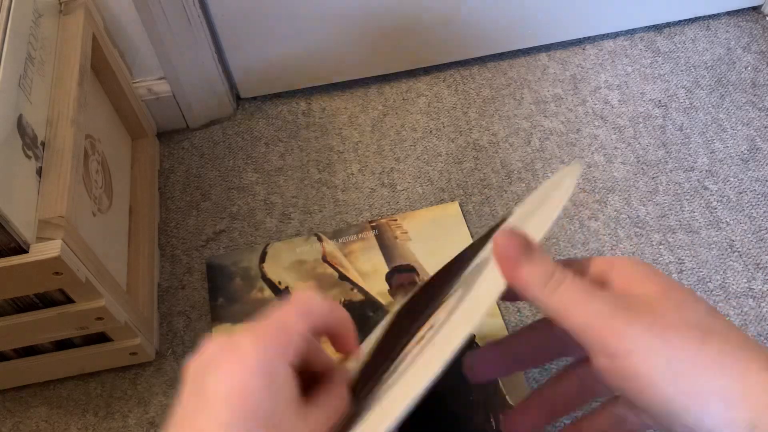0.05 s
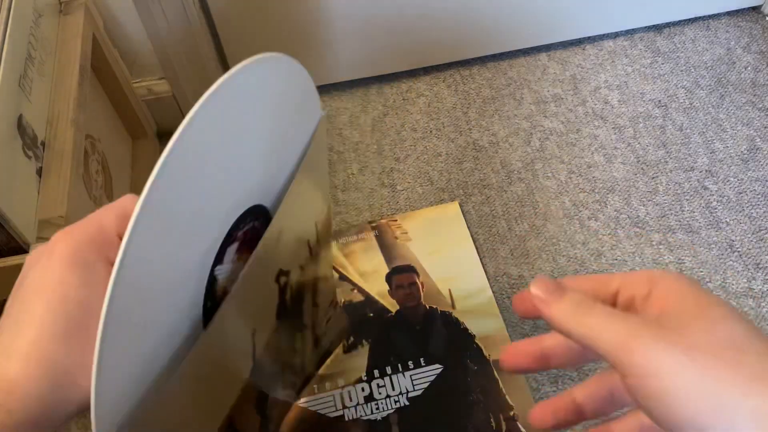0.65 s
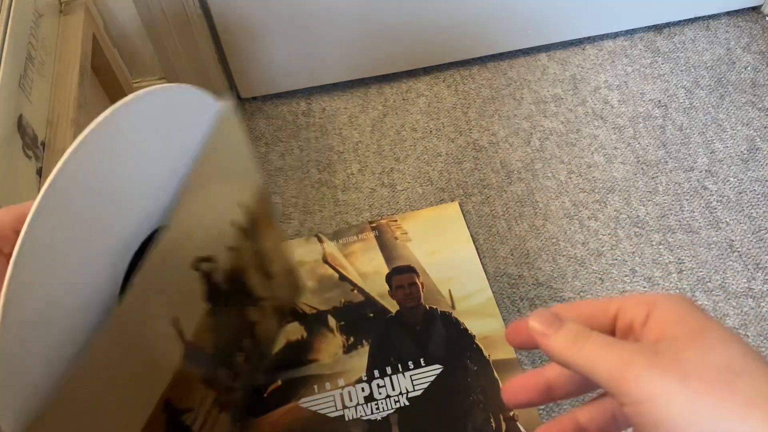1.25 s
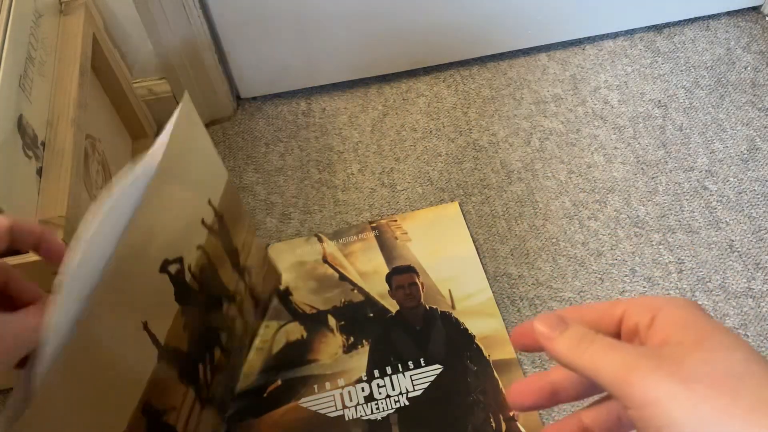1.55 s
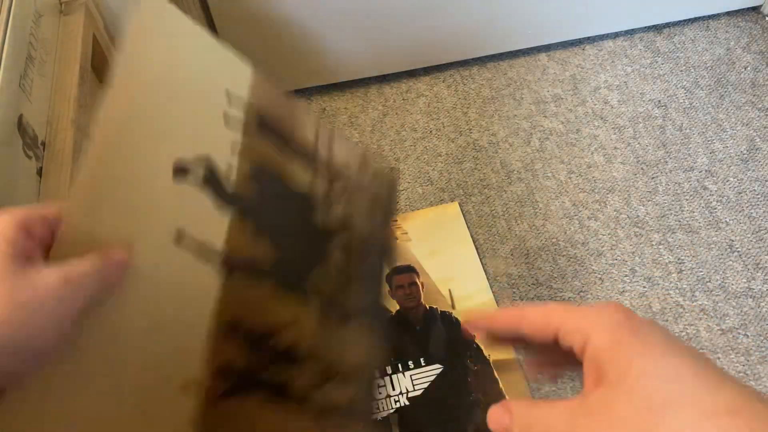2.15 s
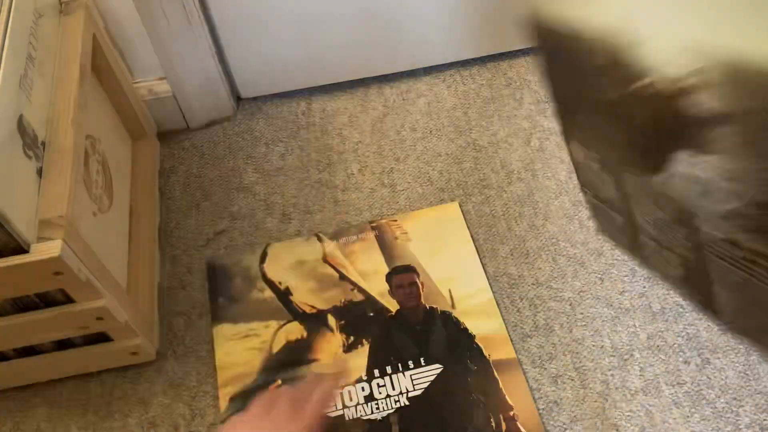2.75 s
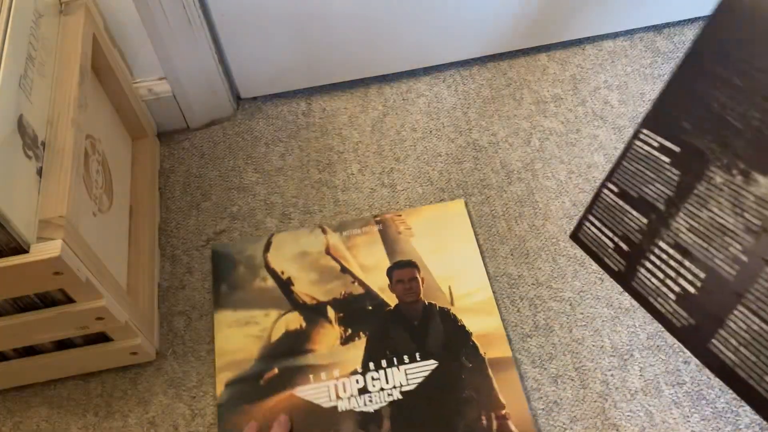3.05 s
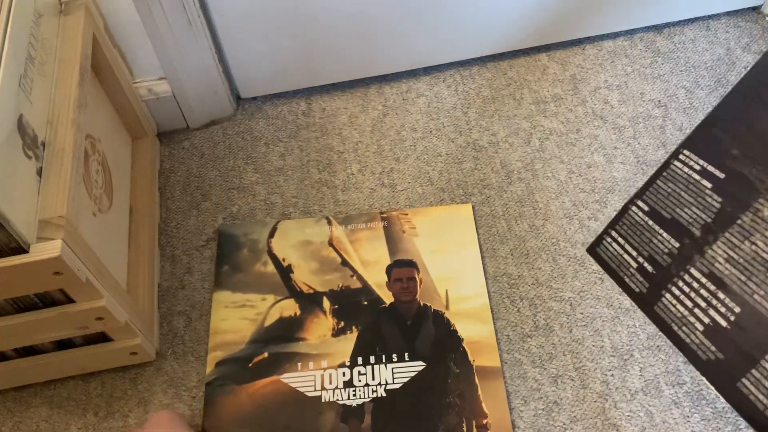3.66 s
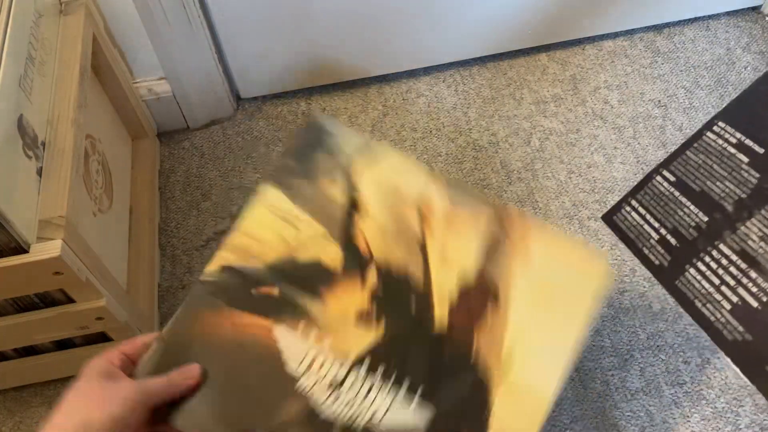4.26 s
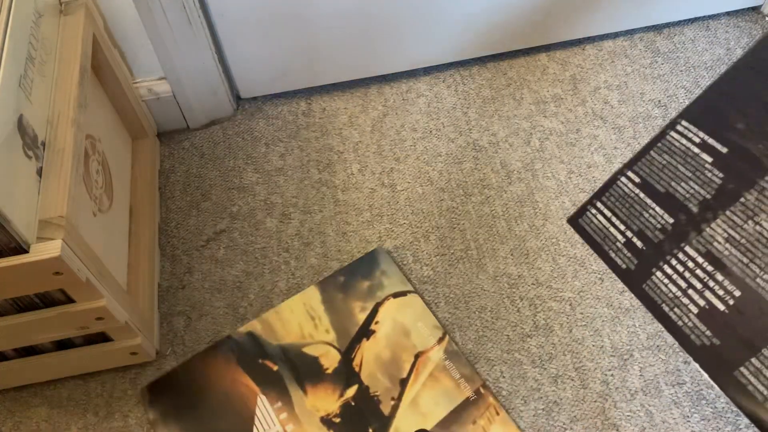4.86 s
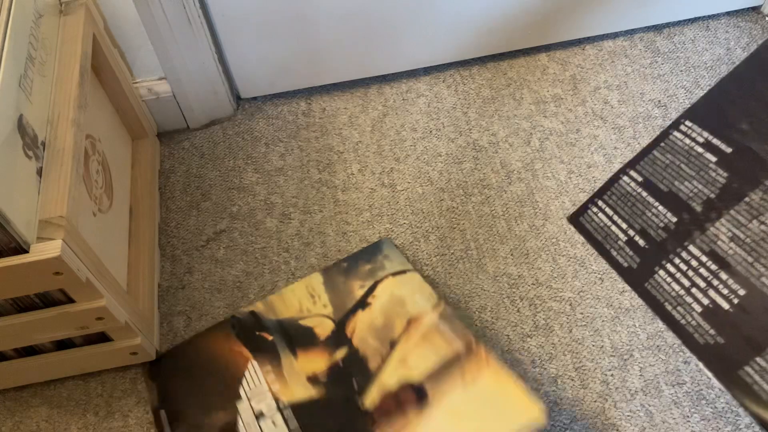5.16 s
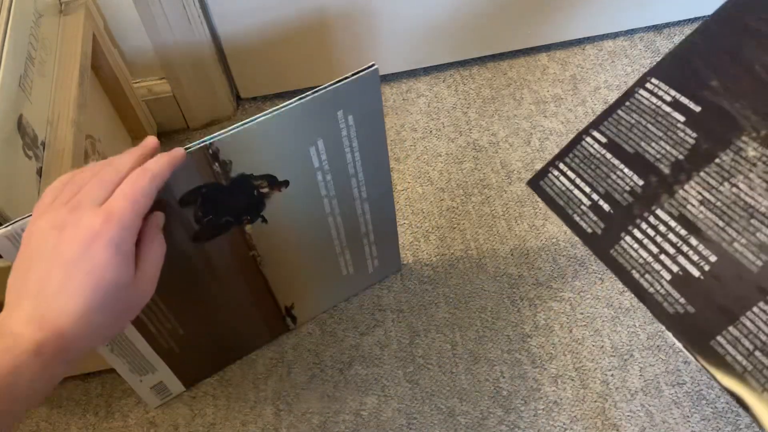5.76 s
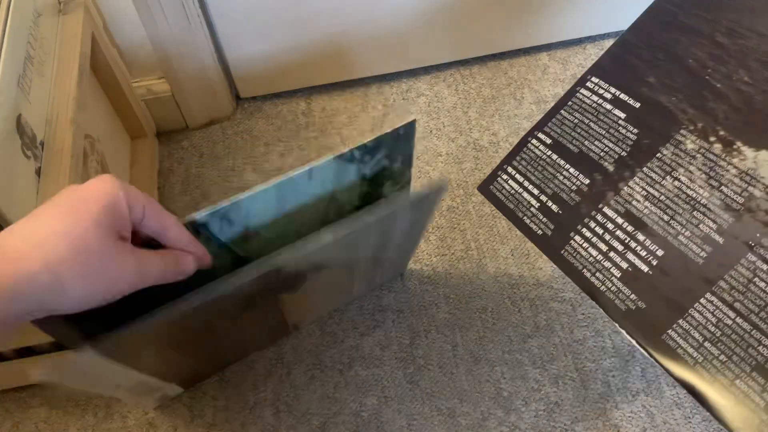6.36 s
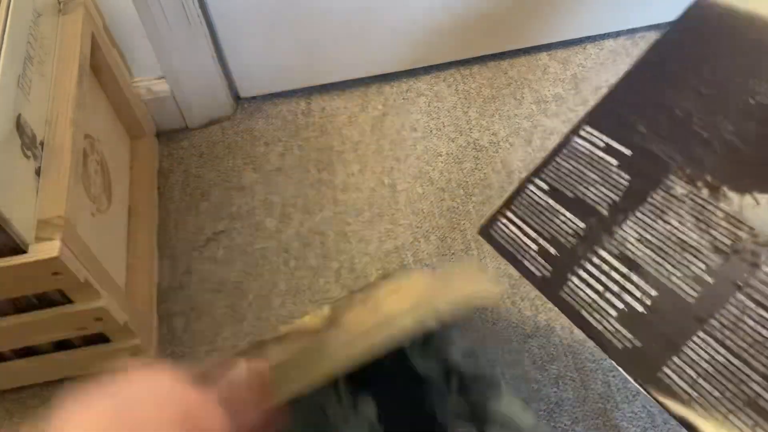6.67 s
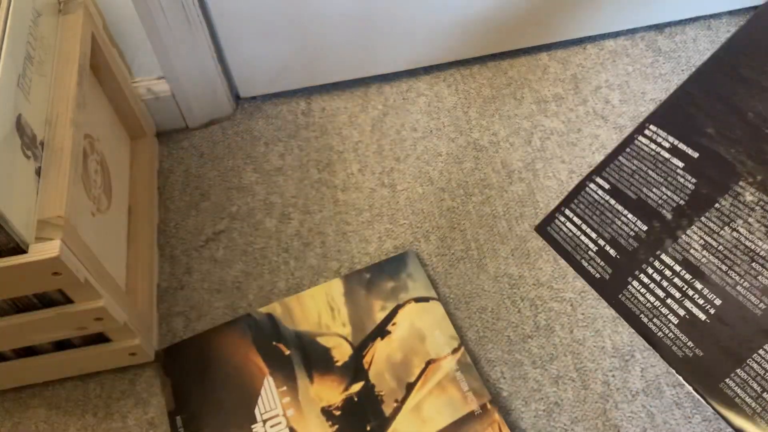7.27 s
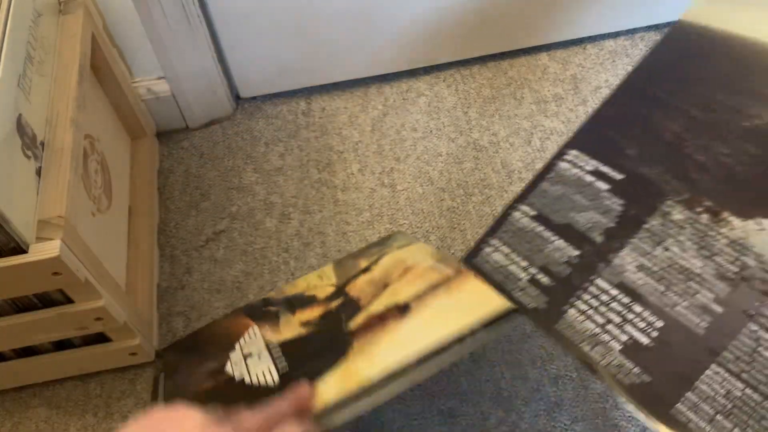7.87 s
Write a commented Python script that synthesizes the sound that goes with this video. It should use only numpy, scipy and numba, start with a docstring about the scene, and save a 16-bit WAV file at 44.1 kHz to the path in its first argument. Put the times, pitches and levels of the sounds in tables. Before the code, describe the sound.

A vinyl record slides into its paper sleeve in short hissing pushes, with sharp crinkles, light knocks and a low flexing of the sheet. The sleeve is laid on carpet with a brush and a few taps. A cardboard jacket is then picked up, bumped down and opened, with softer rubbing and scattered clicks. Everything is close to the microphone in a small, quiet room.

```python
"""Paper and card, handled up close: a vinyl record slides into its paper sleeve, the sleeve is laid
on a carpet, and a cardboard jacket is picked up and opened. Fibres catch and slip, so edges hiss and
broad faces rub; bending shakes the sheet's low modes, the card knocks and creases snap.
A phone's two microphone ports hear it in a small, quiet room."""
import sys
import numpy as np
from scipy import signal
from scipy.fft import rfft, irfft, next_fast_len
from scipy.io import wavfile
from numba import njit

SR = 44100
rng = np.random.default_rng(int(sys.argv[2]) if len(sys.argv) > 2 else 0)


def to_wav(sig):
    """Store sig (one row per channel, or 1-D mono) as 16-bit WAV at the path in sys.argv[1].

    Samples outside -1..1 are clipped; the rate is SR.
    """
    pcm = np.clip(np.atleast_2d(sig), -1, 1) * 32767
    pcm = np.round(pcm).astype(np.int16)
    wavfile.write(sys.argv[1], SR, pcm.T)  # frames by channels


N = 358091


def undb(db):
    """Decibels to gain."""
    return 10 ** (np.asarray(db) / 20)


def unit(x):
    """Scale to rms 1."""
    return x / np.sqrt(np.mean(x ** 2) + 1e-20)


def unit_peak(x):
    """Scale to peak 1."""
    return x / np.abs(x).max()


def curve_at(points, hz, column=1):
    """A column of a table, interpolated on a log-frequency axis."""
    table = np.array(points, float)
    return np.interp(np.log(hz + 1), np.log(table[:, 0]), table[:, column])


def filtered(x, response):
    """Pass x through a response given as a function of frequency."""
    size = next_fast_len(x.shape[-1] + 4096)
    hz = np.arange(size // 2 + 1) * SR / size
    return irfft(rfft(x, size) * response(hz), size)[..., :x.shape[-1]]


def colour(x, eq, size=1024):
    """Minimum-phase EQ, which keeps attacks sharp; the result has rms 1."""
    hz = np.arange(size // 2 + 1) * SR / size
    cepstrum = irfft(np.log(undb(curve_at(eq, hz))))
    cepstrum[1:size // 2] *= 2
    cepstrum[size // 2 + 1:] = 0
    impulse = irfft(np.exp(rfft(cepstrum)))
    return unit(signal.oaconvolve(x, impulse)[:len(x)])


def resonance(f, hz, width):
    """Response of one damped mode, gain 1 at its centre."""
    return 1j * f * width / (hz ** 2 - f ** 2 + 1j * f * width)


@njit
def swept_band(x, hz, width_ratio):
    """State-variable band-pass with a moving centre."""
    out, band_state, low_state = np.empty(len(x)), 0., 0.
    for i in range(len(x)):
        g = np.tan(np.pi * hz[i] / SR)
        band = (band_state + g * (x[i] - low_state)) / (1 + g * (g + width_ratio))
        band_state = 2 * band - band_state
        low_state += 2 * g * band
        out[i] = width_ratio * band
    return out


def wander(rate_hz):
    """Random modulator: straight ramps between random levels, spread near 1."""
    steps = rng.standard_normal(8192)
    return 1.2 * np.interp(np.arange(N) / SR * rate_hz, np.arange(len(steps)), steps)


def place(track, start_s, sound):
    """Mix a one-shot into a track."""
    start = max(int(start_s * SR), 0)
    track[start:start + len(sound)] += sound[:max(N - start, 0)]


def stroke_power(start, swell, fade, db, depth_db=18.5):
    """One hand movement gathers speed, peaks and dies away; swell and fade each span depth_db."""
    from_peak = np.arange(0, N, 32) / SR - start - swell
    rising = np.abs(from_peak / max(swell, .002)) ** 1.7
    falling = np.abs(from_peak / max(fade, .002)) ** 1.23
    drop_db = depth_db * np.where(from_peak < 0, rising, falling)
    return undb(db - np.minimum(drop_db, 150)) ** 2


def automation(strokes):
    """Lanes for a table of strokes: summed level in dB, then further columns averaged by power."""
    power = np.array([stroke_power(*row[:4]) for row in strokes])
    total = power.sum(axis=0)
    extras = np.array(strokes, float).T[4:] @ power / total
    lanes = [10 * np.log10(total), *extras]
    return [np.interp(np.arange(N), np.arange(0, N, 32), lane) for lane in lanes]


def friction(catches_per_s, spread_db, slip_hz, slip_db, shear):
    """Fibres let go as tiny uneven clicks over smooth shear noise; stick and slip flutter the level."""
    sizes = undb(spread_db * np.minimum(rng.exponential(size=N), 4))
    clicks = (rng.random(N) < catches_per_s / SR) * sizes * rng.choice([-1, 1], N)
    texture = unit(clicks) + shear * rng.standard_normal(N)
    return texture * undb(slip_db * wander(slip_hz))


# Bright EQ of the paper's ticks: f/Hz, level/dB
CRINKLE_EQ = [(400, -25), (1200, -28), (2500, 4.5), (5000, -17), (9000, 4), (16000, 2.5)]


def crinkles(ticks_per_s=45, spread_db=3, decay_s=0.00036):
    """Lone tiny buckles in the paper, each a sharp tick of noise."""
    sizes = undb(spread_db * np.minimum(rng.exponential(size=N), 2))
    triggers = sizes * (rng.random(N) < ticks_per_s / SR)
    envelope = signal.lfilter([1], [1, -np.exp(-1 / (decay_s * SR))], triggers)
    return colour(envelope * rng.standard_normal(N), CRINKLE_EQ)


# EQs of the hiss (coarse grain, fine sheen, air on top): f/Hz, level/dB
COARSE_EQ = [(1500, -20.5), (2600, -3), (3300, -4.5), (4100, -0.5), (5200, -6), (6800, 2.5), (8300, 1.5),
             (10000, -12.5), (14000, -17.5)]
FINE_EQ = [(4000, -30), (7000, -6), (8500, 4), (10500, 0), (12500, -4), (16000, -14)]
AIR_EQ = [(8000, -20), (11000, -8), (13000, -11), (14400, -7), (16000, 1.5)]
# Slides of a paper edge: t/s, swell/s, fade/s, level/dB, fine against coarse fibres/dB
EDGE_STROKES = [(0, 0.0017, 0.083, -46.5, 1.5), (.037, 0.0031, 0.068, -42, -5.5), (.2, 0.036, .03, -70, -6),
                (.255, 0.054, 0.016, -43.5, -9), (.31, 0.039, 0.089, -56, -12),
                (.52, 0.034, 0.026, -35, 10), (.58, 0.027, 0.23, -61.5, -7), (.645, 0.053, 0.045, -46, 5),
                (.84, 0.03, 0.046, -42, -2), (1.01, 0.045, 0.14, -55, -7.5), (1.12, 0.031, 0.073, -47, -6),
                (1.25, 0.091, 0.14, -43, -1.5), (1.451, 0.0089, 0.089, -47, 14),
                (1.45, 0.12, 0.066, -30.5, -1.5), (1.575, 0.0055, 0.076, -36, -6),
                (1.705, 0.018, 0.037, -58.5, -5), (1.827, 0.0034, 0.031, -55, -9),
                (1.87, 0.069, 0.054, -46.5, -4), (2, 0.032, 0.045, -61, -4), (2.11, .08, 0.097, -66, -1),
                (2.2, 0.1, .07, -60.5, -2.5), (2.35, 0.0059, 0.056, -46, 0.5),
                (2.41, 0.15, 0.032, -47, -0.5), (2.67, 0.013, 0.034, -72.5, -7),
                (2.74, 0.031, .04, -76, -8.5), (2.94, 0.024, 0.31, -57, 3), (2.96, 0.14, .11, -50.5, -0.5),
                (3.205, 0.038, 0.072, -55, -1.5), (3.26, 0.045, 0.036, -50, 14),
                (3.465, 0.017, 0.042, -68.5, 3.5), (3.56, 0.037, 0.038, -66.5, -3),
                (3.65, .07, 0.011, -68, 3.5), (3.87, 0.096, .1, -67.5, -3),
                (3.97, 0.049, 0.16, -56.5, -3.5), (4.214, 0.019, 0.25, -59.5, 2.5),
                (4.375, 0.019, 0.12, -52.5, -0.5), (4.44, 0.075, 0.034, -45, -3.5),
                (4.66, .015, 0.092, -65, 2.5), (4.72, 0.073, .08, -70.5, -19), (4.79, 0.13, 0.15, -50.5, 4),
                (5.12, 0.19, 0.05, -65, -4), (5.44, 0.048, 0.023, -69, 4), (5.5, 0.031, .05, -71, 15),
                (5.6, .13, 0.11, -65, -8), (5.96, 0.039, 0.02, -52, -5.5), (6.04, 0.042, 0.2, -52.5, -5.5),
                (6.18, 0.013, 0.024, -51.5, 1), (6.31, 0.0046, 0.044, -50, -7),
                (6.39, 0.065, 0.033, -56.5, -0.5), (6.547, 0.023, 0.025, -51.5, -3.5),
                (6.58, 0.009, 0.06, -49.5, -1), (6.69, 0.15, 0.18, -65, -5), (7.05, 0.057, 0.37, -78.5, -2),
                (7.41, 0.049, .05, -61, 0), (7.51, 0.044, 0.041, -58.5, -3), (7.565, .025, 0.028, -64, 6),
                (7.65, 0.045, 1, -70, -2), (8.014, .02, 0.16, -49.5, 1)]


def edge_hiss(light_touch_db=-53):
    """A sliding edge hisses and crinkles. Returns the sound and the coarse fibres' level in dB."""
    hiss_db, bright_db = automation(EDGE_STROKES)
    coarse_db = hiss_db - 10 * np.log10(1 + undb(bright_db) ** 2)
    air_db = np.clip(2 * (light_touch_db - coarse_db), -12, 2)  # a light touch sounds airier
    fibres = friction(catches_per_s=2200, spread_db=-0.5, slip_hz=170, slip_db=2.5, shear=0.98)
    air = undb(air_db) * colour(rng.standard_normal(N), AIR_EQ)
    coarse = undb(coarse_db) * colour(fibres, COARSE_EQ)
    fine = undb(coarse_db + bright_db) * (colour(fibres, FINE_EQ) + air)
    return coarse + fine + undb(hiss_db - 14) * crinkles(), coarse_db


# Body modes of a record-sized card, shared by flex and knocks: f/Hz, width/Hz, level/dB
CARD_MODES = [(95.5, 11, 3), (127.4, 16, -2.5), (200.5, 46.6, 2), (238, 28.3, 1), (280.6, 31.6, 3),
              (356.8, 92, 4), (436.5, 107, 2), (523.4, 71, 1), (575, 78, -2), (800, 90, -11),
              (880, 256, -20)]
# The sheet bending in the hands: t/s, swell/s, fade/s, level/dB
BEND_STROKES = [(0, 0.0067, 0.14, -42), (.3, 0.015, .08, -52), (.39, 0.13, 0.24, -51.5),
                (.525, 0.01, 0.064, -38), (.77, 0.023, 0.6, -59.5), (1.08, 0.13, 0.29, -59),
                (1.27, .07, 0.16, -43.5), (1.452, 0.018, 0.063, -50), (1.58, 0.032, 0.084, -38.5),
                (1.88, 0.043, 0.13, -48), (2.05, .14, 0.067, -53.5), (2.35, 0.025, 0.41, -57),
                (2.66, 0.16, .06, -70.5), (2.97, 0.14, 0.098, -49.5), (3.21, 0.047, 0.061, -48.5),
                (3.46, 0.15, 0.25, -61.5), (3.8, 0.12, .1, -65.5), (3.92, 0.22, 0.042, -54.5),
                (4.38, 0.013, 0.063, -37.5), (4.5, 0.033, 0.12, -39.5), (5.2, 0.11, 0.054, -64),
                (5.6, 0.067, 0.3, -59), (6.04, 0.14, 0.057, -51.5), (6.31, 0.028, 0.12, -52.5),
                (6.57, 0.06, 0.03, -54), (7.05, 0.078, .35, -65), (7.555, 0.0079, 0.073, -51.5),
                (7.68, 0.086, 0.07, -62), (7.85, 0.042, 0.23, -55), (8.01, .03, 0.27, -45)]


def sheet_flex(grip_db, full_drag_db=-58):
    """Low body: bending, and the drag of a sliding edge, shake the sheet's own modes."""
    def body(f):
        return sum((-1) ** k * undb(db) * resonance(f, hz, width)
                   for k, (hz, width, db) in enumerate(CARD_MODES))

    bend_db, = automation(BEND_STROKES)
    drag_db = full_drag_db + 0.58 * grip_db
    drive = friction(catches_per_s=300, spread_db=1.5, slip_hz=37, slip_db=4.5, shear=0.56)
    return np.hypot(undb(bend_db), undb(drag_db)) * unit(filtered(drive, body))


# EQ of a knock's attack: f/Hz, level/dB
CRACK_EQ = [(200, -21), (600, 2.5), (1000, 4.5), (1500, -3), (2200, 5.5), (3300, -9.5), (6000, -23),
            (16000, -9.5)]
# Hits of record, card and fingers: t/s, level/dB, f/Hz, crack trim/dB, ring t60/s
KNOCK_HITS = [(.003, -38, 384, -3, 0.085), (.292, -40, 321, 6, 0.27), (0.428, -43, 263, -32, .16),
              (0.5302, -28.5, 341, -15, 0.12), (0.796, -42, 322, -10, 0.098), (0.856, -39, 248, -22, 0.15),
              (1.0164, -29.5, 366.6, -0.5, 0.11), (1.241, -50.5, 304, 11, .07),
              (1.4524, -32, 320, -2.5, .11), (1.58, -32.5, 260, 3, 0.064), (1.594, -38, 198, 4, 0.052),
              (1.605, -34, 265, -22, 0.091), (1.623, -33, 287, -31, 0.039), (1.829, -47, 183, -3, 0.058),
              (1.938, -33.5, 250, -7, .06), (2.366, -38, 263, -7, .06), (2.894, -50, 291, 0.5, .07),
              (3.073, -38.5, 328, -3, 0.083), (3.1465, -29, 560, -2, 0.039), (3.206, -29, 505, -9, 0.03),
              (3.479, -58.5, 300, -13, 0.077), (3.665, -53.5, 306, 0, 0.055), (4.023, -53, 278, 5.5, .08),
              (4.386, -33, 450, -12, 0.18), (4.406, -29.5, 238, -28, 0.041), (4.533, -36, 220, -24, 0.084),
              (4.554, -28.5, 288, -10, 0.065), (4.561, -41, 434, 0, 0.056), (4.975, -45.5, 314, 0.5, 0.089),
              (5.993, -51.5, 382, 5.5, 0.27), (6.064, -48.5, 274, 3, 0.36), (6.317, -44, 312, 9.5, .14),
              (6.551, -61, 300, 14, 0.046), (6.592, -49, 174, 12.5, 0.058), (6.663, -48.5, 172, -7, 0.033),
              (6.866, -50, 414, -2, 0.095), (7.058, -55, 410, -9, .07), (7.556, -33.5, 463, -13, .06),
              (7.632, -43, 483, -17, 0.067), (8.017, -41, 450, 8, 0.075)]


def card_knocks(reach_octaves=0.35, ring_db=-3.5, crack_db=3, thud_hz=76, thud_s=0.011):
    """The struck spot bounces and rings nearby modes; surfaces crack and pushed air thuds."""
    out, t = np.zeros(N), np.arange(7000) / SR
    mode_hz, width, mode_db = np.array(CARD_MODES, float).T
    polarity = (-1) ** np.arange(len(CARD_MODES))
    thud = np.sin(2 * np.pi * thud_hz * t) * t / thud_s * np.exp(1 - t / thud_s)
    for start, db, hz, crack_trim_db, t60 in KNOCK_HITS:
        damping = np.log(1000) / max(t60, .005)
        spot = np.sin(2 * np.pi * hz * t) * np.exp(-damping * t / 0.47)  # dies before the ring
        # the grip detunes each mode and changes its share
        detune, share = rng.standard_normal((2, len(CARD_MODES)))
        distance = np.log2(mode_hz / hz) / reach_octaves
        gains = polarity * undb(mode_db + 5.5 * share) / (1 + distance ** 2)
        tones = np.sin(2 * np.pi * np.outer(mode_hz * (1 + 0.0556 * detune), t))
        decays = np.exp(-np.outer(damping * width / width.mean(), t))
        ring = unit_peak(gains @ (tones * decays))
        burst = rng.standard_normal(len(t)) * np.exp(-t / 0.0043)
        crack = unit_peak(colour(burst, CRACK_EQ))
        hit = spot + undb(ring_db) * ring + undb(crack_db + crack_trim_db) * crack
        thud_db = -58.5 + 0.72 * (db + 41)  # grows more slowly than the hit; -41 dB is a usual knock
        place(out, start, undb(db) * hit + undb(thud_db) * thud)
    return out


# Midrange EQ of flat contact: f/Hz, level/dB
RUB_EQ = [(300, 1.5), (600, -18.5), (1000, 6.5), (1500, 1), (2100, 6), (2700, 4.5), (3500, 5), (6000, -68)]
# Rubs of broad faces: t/s, swell/s, fade/s, level/dB, air gap f/Hz, gap's share of the power/0-1
FACE_STROKES = [(.033, 0.011, 0.089, -47.5, 1200, 0.04), (.62, 0.026, 0.027, -62, 1300, 0),
                (1.12, 0.018, 0.091, -51.5, 1320, 0.12), (1.28, 0.041, .08, -49.5, 1100, 0.27),
                (1.578, .012, 0.088, -45, 943, 1), (2.14, 0.024, 0.061, -74, 1200, 0.2),
                (2.66, .03, 0.14, -79.5, 1200, 0), (2.945, 0.016, 0.18, -62.5, 1190, 0.23),
                (3.02, .12, .11, -58.5, 1100, 0.5), (3.5, 0.11, 0.17, -68.5, 2000, 0.2),
                (3.82, 0.15, 0.057, -69, 2400, 0.3), (3.965, 0.035, 0.073, -52, 2200, 0.25),
                (4.04, 0.087, 0.061, -60, 1000, 0.65), (4.2, .04, 0.41, -78, 1485, 0),
                (4.378, 0.0045, .1, -51, 1400, 0.7), (4.54, 0.016, 0.029, -46, 1000, 0),
                (4.76, .15, 0.19, -58, 2700, 0.9), (5.15, 0.12, 0.089, -69, 1600, 0.03),
                (5.61, 0.032, 0.11, -58, 1908, 0.55), (5.66, 0.084, 0.116, -59.5, 1880, 1),
                (5.82, 0.042, 0.16, -64.5, 2050, 1), (5.96, 0.028, 0.03, -50.5, 1800, 0),
                (6.055, 0.065, 0.12, -47.5, 1347, 0.84), (6.308, 0.011, 0.038, -44, 1100, 0.2),
                (6.35, 0.058, 0.035, -52.5, 1080, 0.94), (6.55, 0.067, 0.049, -55.5, 1200, .2),
                (6.68, 0.17, 0.18, -58, 2870, 0.72), (7.06, 0.066, .1, -64.5, 2610, 0.3),
                (7.12, 0.12, 0.25, -68, 1400, 0.54), (7.425, .035, .06, -65, 2400, 0.5),
                (7.52, 0.024, 0.036, -59, 1320, 0), (7.6, 0.15, .25, -68, 2700, 0.6),
                (7.8, 0.16, 0.079, -60, 2700, 0.54), (8.014, 0.0017, 0.13, -48, 1250, 0.3)]


def face_rub(grip_db, full_drag_db=-55, gap_width_ratio=0.92):
    """Faces rub on each other and the carpet, hollowed by the air gap; a sliding edge drags them."""
    rub_db, gap_hz, gap_share = automation(FACE_STROKES)
    gap_share = np.clip(gap_share, 0, 1)
    drag_db = full_drag_db + 0.91 * grip_db
    scuff = friction(catches_per_s=2000, spread_db=1.0, slip_hz=95, slip_db=5.0, shear=0.67)
    # on a cushion of air the faces slide more evenly
    glide = friction(catches_per_s=3400, spread_db=2.8, slip_hz=41, slip_db=2.0, shear=0.99)
    for _ in range(2):
        glide = swept_band(glide, gap_hz, gap_width_ratio)
    hollow = unit(glide / np.sqrt(gap_hz))  # even loudness across the sweep
    flat_gain = np.hypot(undb(rub_db) * np.sqrt(1 - gap_share), undb(drag_db))
    return flat_gain * colour(scuff, RUB_EQ) + undb(rub_db) * np.sqrt(gap_share) * hollow


# Snaps of creases and edges: t/s, peak level/dB, f/Hz, decay/s
SNAP_HITS = [(0.0407, -29.5, 6000, 0.0046), (0.1704, -49.5, 11500, 0.0035), (0.2852, -22.5, 9760, 0.00099),
             (0.2997, -19.5, 6000, 0.0023), (0.5186, -28.5, 6200, 0.0041), (0.527, -15.5, 10600, 0.0032),
             (0.5365, -24.5, 7200, 0.0048), (0.5511, -22.5, 9600, .005), (0.561, -20, 7400, .003),
             (0.858, -33, 10300, 0.0052), (1.014, -32.5, 2030, .0023), (1.2502, -31, 6400, 0.0058),
             (1.3195, -29, 10700, 0.0024), (1.3653, -23.5, 8540, 0.0028), (1.577, -16.5, 2780, 0.0027),
             (1.5775, -15, 11000, .0015), (1.723, -37, 4500, 0.0085), (1.873, -39, 2560, 0.0051),
             (1.9123, -34.5, 3450, 0.0072), (1.936, -23, 10200, 0.0039), (2.3559, -40, 4300, 0.0042),
             (2.497, -37, 7000, 0.0054), (2.547, -26, 11400, 0.0043), (2.8934, -54, 6000, .004),
             (3.1459, -30.5, 2590, 0.002), (3.2053, -34, 6650, 0.0043), (3.251, -39, 9870, 0.0051),
             (3.603, -49.5, 3580, .0034), (3.714, -49, 10400, 0.0032), (3.795, -60.5, 10400, 0.0044),
             (4.218, -43, 10300, 0.0043), (4.488, -41, 3870, .0034), (4.5588, -32, 2100, 0.0027),
             (5.9768, -50, 2050, .004), (6.3158, -27, 3830, 0.0023), (6.591, -34, 5500, 0.0042),
             (7.5492, -41.5, 3760, 0.0023), (8.015, -46, 3100, 0.0051)]


def crease_snaps(width_ratio=0.74, attack_s=0.00023):
    """A crease gives way: a noise burst of a few milliseconds, broad around its own pitch."""
    out, t = np.zeros(N), np.arange(2048) / SR
    for start, db, hz, decay in SNAP_HITS:
        envelope = (1 - np.exp(-t / attack_s)) * np.exp(-t / decay)
        burst = rng.standard_normal(len(t)) * envelope
        snap = filtered(burst, lambda f: resonance(f, hz, width_ratio * hz))
        place(out, start, undb(db) * unit_peak(snap))
    return out


# Phase between the microphone ports, fully off axis: f/Hz, left lead/rad
PORT_LEAD = [(20, 0), (600, .1), (1200, .9), (2000, 2.4), (3000, 3.2), (4500, 6.2), (6000, 6.6),
             (8400, 3.14), (10400, .1), (11500, -.1), (13400, -3.14), (15400, -6.2)]


def direct_path(x, off_axis):
    """Sound reaches the two ports at different times, more so further off axis (0-1)."""
    def phase_pan(f):
        lead = off_axis * np.interp(f, *np.transpose(PORT_LEAD))
        return np.exp(.5j * np.outer([1, -1], lead))

    return filtered(x, phase_pan)


def sheet_reflection(x, gain=.42, lag_s=0.00092, sway=0.367, sway_hz=2.5):
    """Light flanging: the moving sheets mirror the sound to each port over a short, changing path."""
    n = np.arange(N)
    delays = [SR * lag_s * np.exp(sway * wander(sway_hz)) for _ in range(2)]
    return gain * np.array([np.interp(n - delay, n, x) for delay in delays])


# Small-room reverb: f/Hz, t60/s, level against the direct sound/dB
REVERB_BANDS = [(101, 0.34, -1), (290, 0.47, -22.5), (818, 0.13, -2), (1975, 0.24, -7), (4900, 0.13, -2.5),
                (9150, 0.019, -30.5), (15470, 0.16, -36)]


def room_reverb(x, predelay_s=0.0053):
    """Door, crate and walls return a short diffuse tail; the carpet swallows its treble."""
    t = np.arange(SR // 2) / SR
    impulse = np.zeros((2, len(t)))
    for hz in 62.5 * 2 ** np.arange(9):  # overlapping octave bands
        decay = np.exp(-np.log(1000) * t / curve_at(REVERB_BANDS, hz))
        tail = rng.standard_normal((2, len(t))) * (t > predelay_s) * decay
        tail = unit(tail) / np.sqrt(len(t)) * undb(curve_at(REVERB_BANDS, hz, column=2))
        impulse += filtered(tail, lambda f: np.sqrt(np.maximum(1 - np.abs(np.log2((f + 1) / hz)), 0)))
    return signal.fftconvolve(x[None], impulse, axes=1)[:, :N]


# EQ of house rumble and microphone hiss: f/Hz, level/dB
ROOM_TONE_EQ = [(20, -19.5), (35, -3), (52, 8.5), (85, 4), (115, -4.5), (155, -26), (290, -16), (600, -27),
                (1500, -33), (4000, -34), (10000, -44), (16000, -36.5)]


def room_tone(level_db=-63, sway_db=4.5, wide_above_hz=700):
    """A wavering house rumble near the centre, under a faint, wide microphone hiss."""
    mid, side = filtered(rng.standard_normal((2, N)), lambda f: undb(curve_at(ROOM_TONE_EQ, f)))
    side = filtered(unit(side), lambda f: np.clip(f / wide_above_hz, .15, 1))
    mid = unit(mid) * undb(sway_db * wander(5.2))
    return undb(level_db) * (mid + np.outer([1, -1], side))


def scene(full_grip_db=-48):
    """The mix: edges to one side, broad faces nearer the centre, reflections and room tone."""
    hiss, coarse_db = edge_hiss()
    grip_db = np.minimum(coarse_db - full_grip_db, 0)  # coarse fibres drag the sheet and the faces
    edges = hiss + sheet_flex(grip_db) + crease_snaps() + card_knocks()
    faces = face_rub(grip_db)
    direct = direct_path(edges, off_axis=1) + direct_path(faces, off_axis=.55)
    send = edges + faces
    return direct + sheet_reflection(send) + room_reverb(send) + room_tone()


# Tonal balance of the microphone ports: f/Hz, left minus right level/dB
PORT_EQ = [(60, -0.5), (280, 0.9), (600, 3.5), (1200, 3), (2200, 1.5), (5200, -3), (8000, 0.5), (16000, 0)]


def record(dry, low_cut_hz=36, high_cut_hz=15850):
    """The phone: each port has its own colour; sub-bass and extreme top are cut steeply."""
    heard = filtered(dry, lambda f: undb(np.outer([1, -1], curve_at(PORT_EQ, f)) / 2))
    heard = signal.sosfilt(signal.butter(4, low_cut_hz, "high", fs=SR, output="sos"), heard)
    return signal.sosfilt(signal.ellip(10, .2, 70, high_cut_hz, fs=SR, output="sos"), heard)


dry = scene()
out = record(dry)
to_wav(out)
```